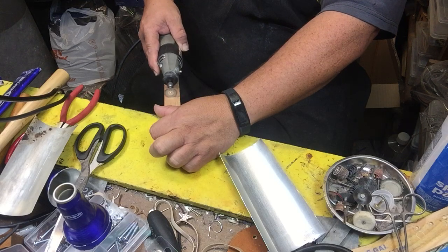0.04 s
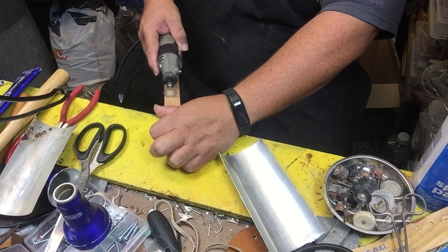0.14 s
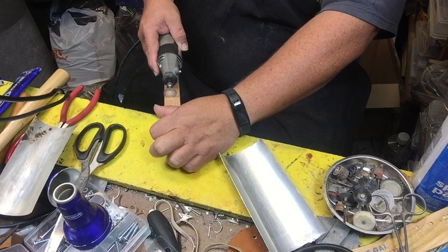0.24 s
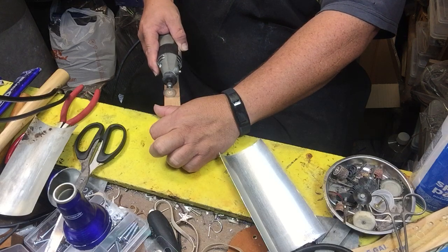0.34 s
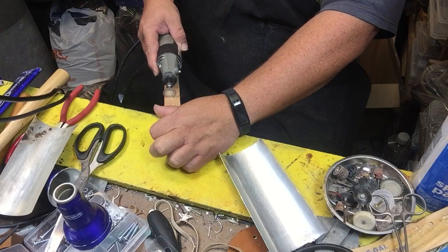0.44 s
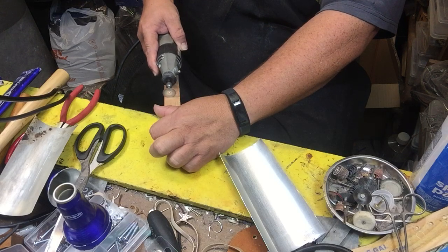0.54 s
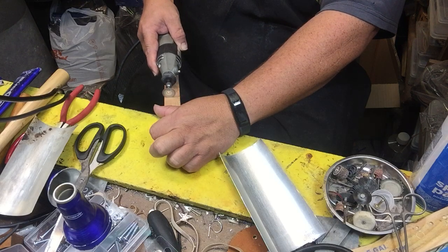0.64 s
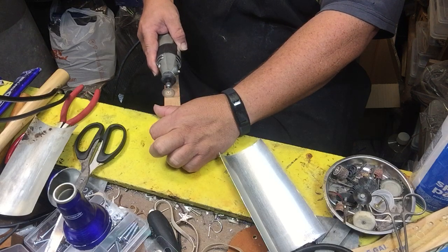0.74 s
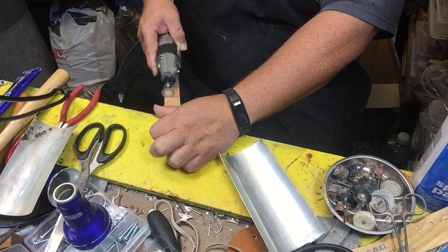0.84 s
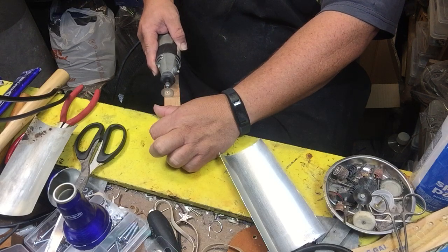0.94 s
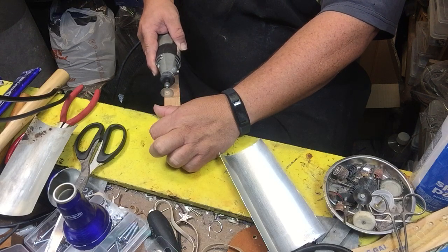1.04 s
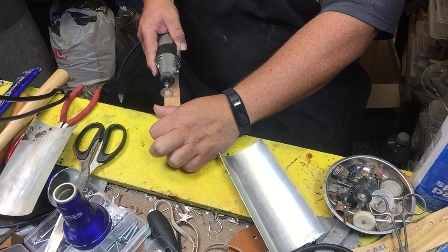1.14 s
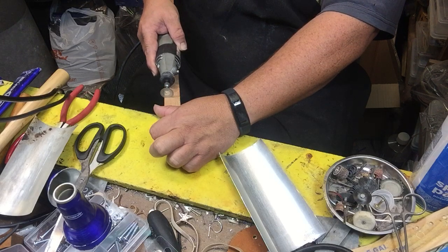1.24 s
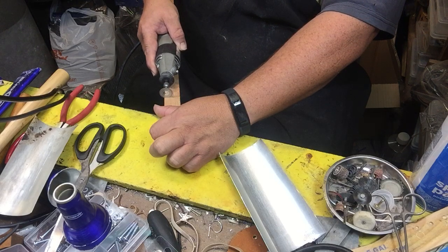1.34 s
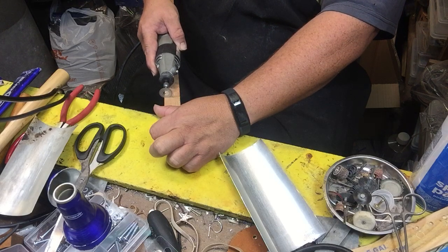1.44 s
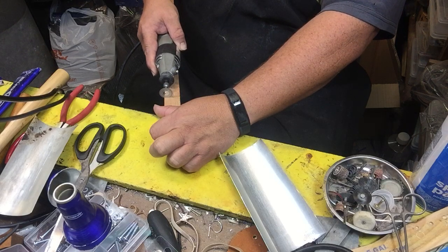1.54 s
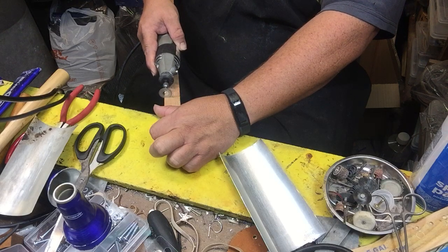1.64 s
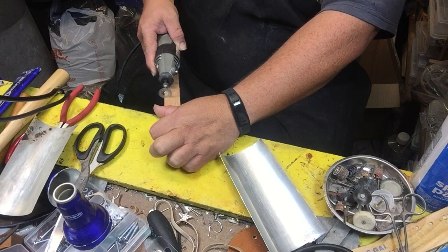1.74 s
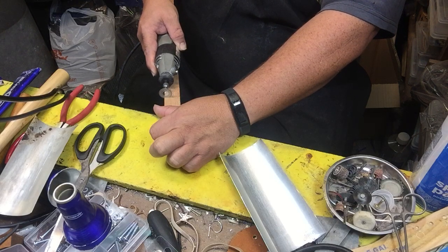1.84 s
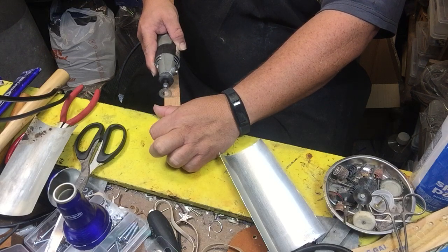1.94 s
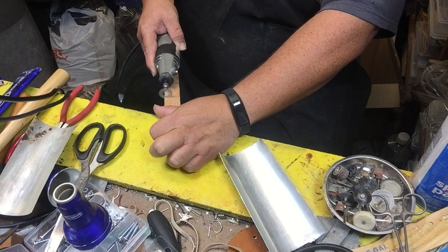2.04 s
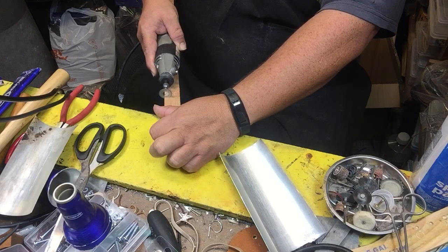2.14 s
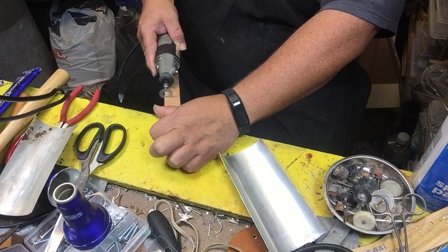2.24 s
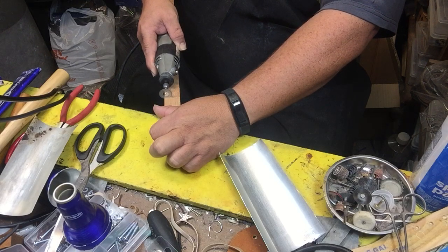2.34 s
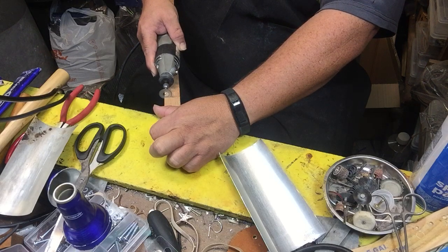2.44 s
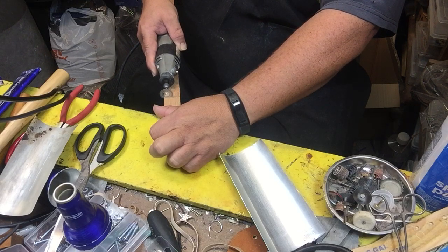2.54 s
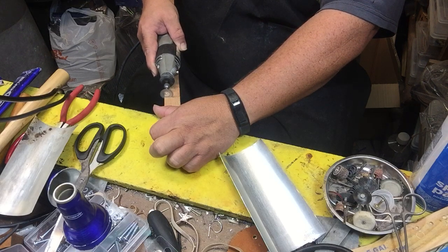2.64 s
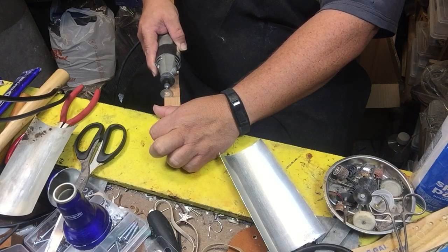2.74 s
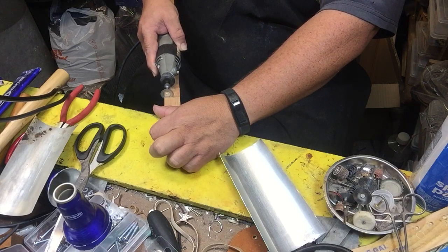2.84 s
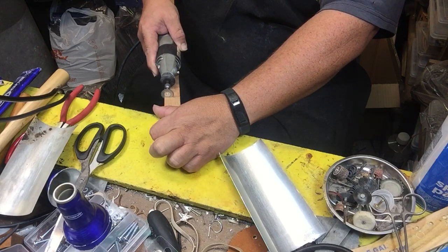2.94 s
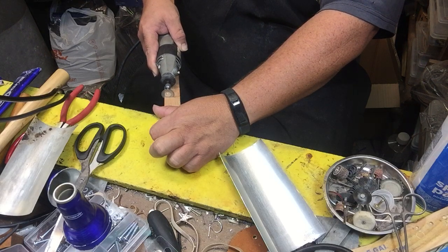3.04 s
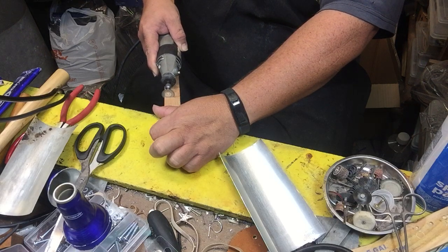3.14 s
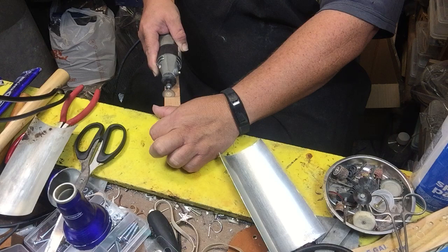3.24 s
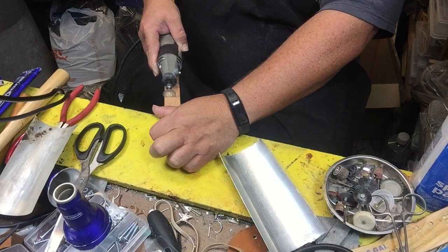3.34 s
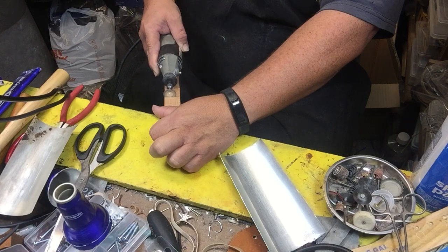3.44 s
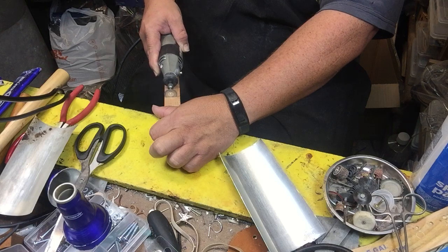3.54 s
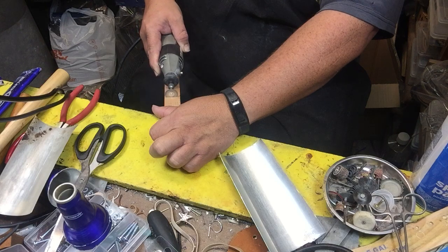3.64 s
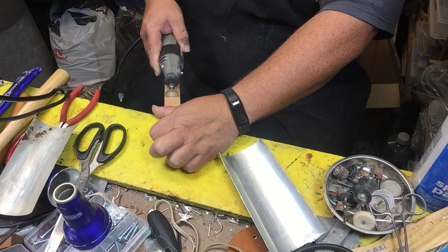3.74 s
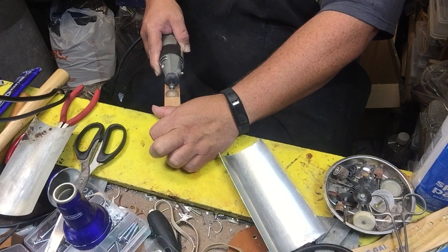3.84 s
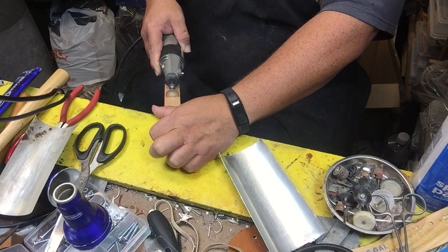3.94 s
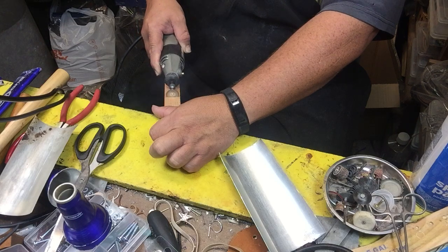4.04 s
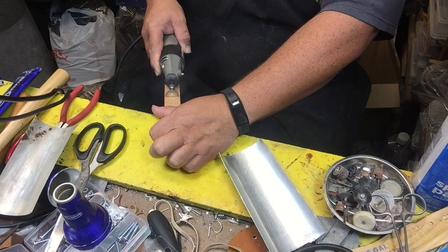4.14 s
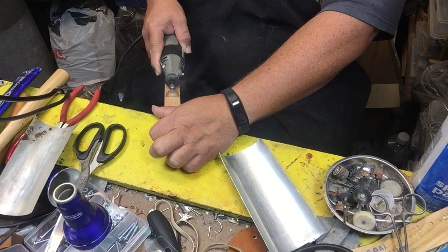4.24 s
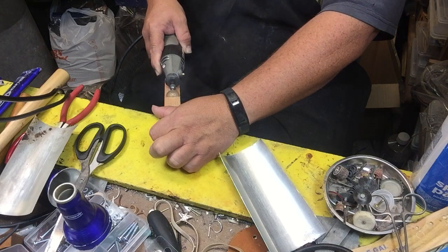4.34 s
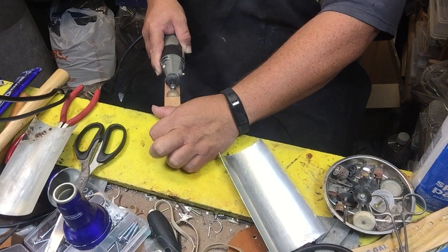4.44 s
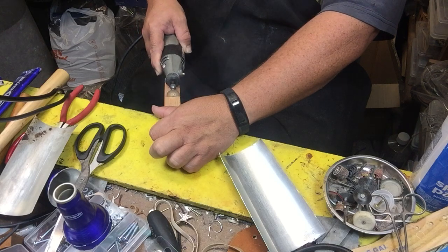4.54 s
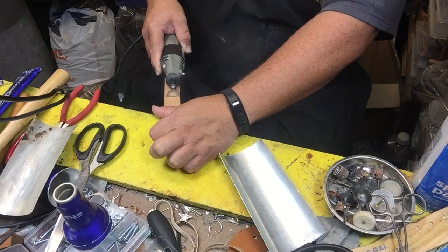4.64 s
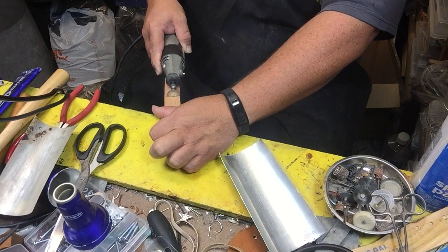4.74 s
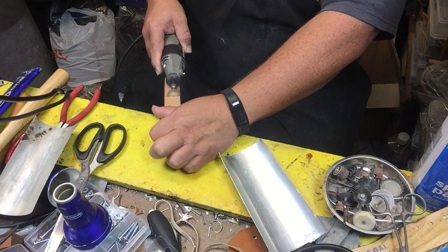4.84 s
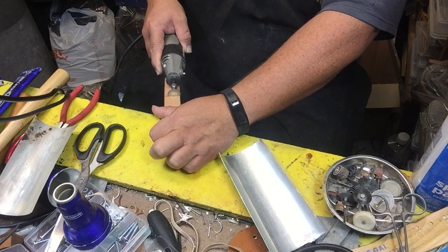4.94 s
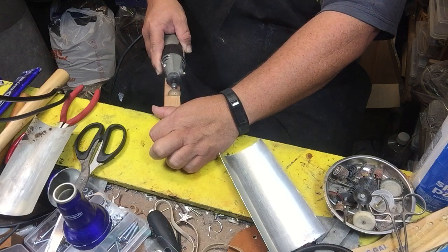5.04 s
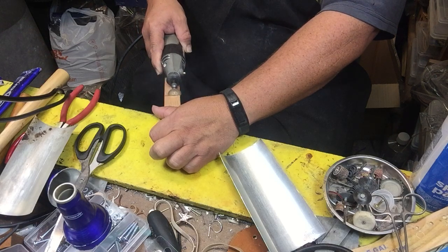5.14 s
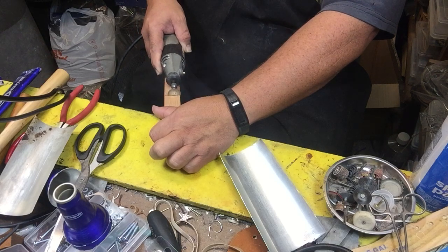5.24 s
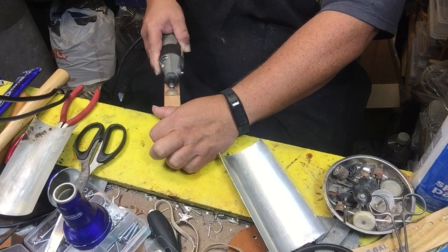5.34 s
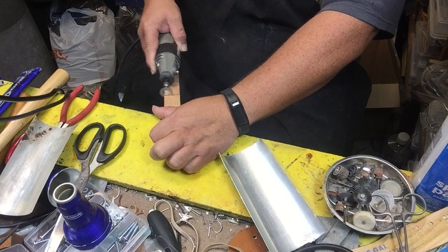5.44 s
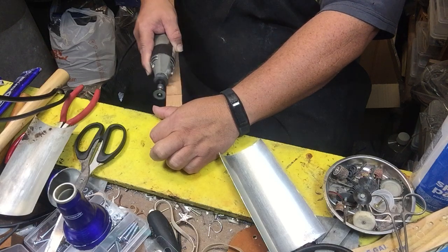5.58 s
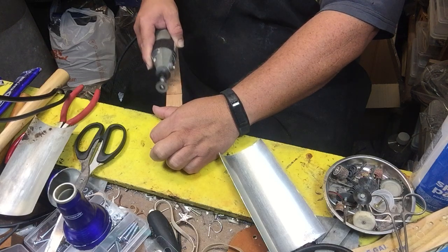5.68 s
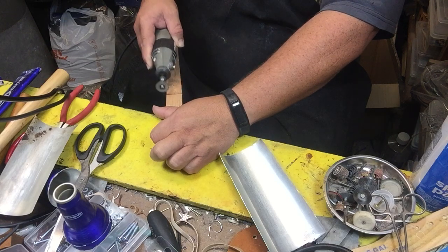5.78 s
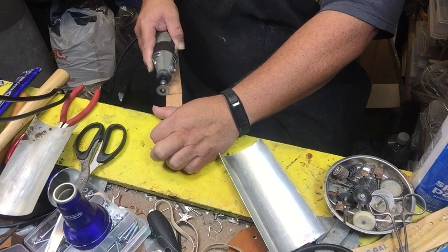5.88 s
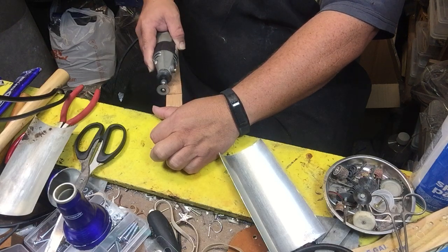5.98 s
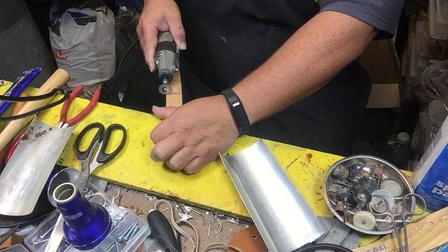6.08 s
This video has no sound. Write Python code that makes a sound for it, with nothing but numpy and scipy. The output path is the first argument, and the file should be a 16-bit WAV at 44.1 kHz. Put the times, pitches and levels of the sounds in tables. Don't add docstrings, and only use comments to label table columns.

```python
import sys
import numpy as np
from scipy import signal
from scipy.fft import rfft, irfft, next_fast_len
from scipy.io import wavfile
from scipy.ndimage import uniform_filter1d, map_coordinates

SR = 44100
rng = np.random.default_rng(int(sys.argv[2]) if len(sys.argv) > 2 else 0)


def gain_from_decibels(decibels):
    exponent = np.asarray(decibels, float) / 20
    return 10 ** exponent


def int16_out(signal):
    q = np.round(np.clip(np.atleast_2d(signal).T, -1, 1) * 32767)
    wavfile.write(sys.argv[1], SR, q.astype(np.int16))


N = 269495
RIPPLE_HZ = 120
KNOT_RATE_HZ, TURN_SAMPLES = 100, 2048
STEP_HZ = 50
USUAL_SCRAPE_DB = -30

# (time [s], speed [Hz])
SHAFT_SPEED = [(0, 293.6), (.09, 300.5), (.22, 291.2), (.33, 298.9), (.57, 307.4), (1.05, 302.4),
               (1.38, 311.7), (1.7, 315.1), (2.16, 309.5), (2.46, 282.4), (2.93, 263), (3.17, 228.6),
               (3.37, 225.1), (3.63, 205.3), (3.93, 200), (4.17, 172.8), (4.28, 141.9), (4.7, 233.4),
               (4.81, 242.3), (5.199, 258), (5.39, 296.3), (5.461, 308.3), (5.525, 276.2), (5.749, 283.7),
               (5.84, 309.4), (5.972, 329.7), (6.11, 341.8)]
# (time [s], scrape level [dB], grip to the bench [dB])
HAND_PRESSURE = [(0, -31.5, -3), (.47, -32.5, -1), (1.33, -34.5, -0.5), (1.75, -33, -2), (2.2, -30, 1),
                 (2.7, -31, 2), (3.06, -29, -2.5), (3.3, -24.5, -1.5), (3.85, -22, -1.5),
                 (3.97, -27.5, -11), (4.3, -31.5, -6), (4.66, -29.5, -23), (5.0, -30, -6.5),
                 (5.22, -29, -8), (5.44, -30.5, 3), (5.6, -32, 1.5), (5.75, -29.5, -11.5),
                 (6.11, -36, -9.5)]
# (time [s], half length [s], level [dB])
GRAIN_BITES = [(.01, 0.013, 7), (0.114, 0.02, 6), (0.195, 0.03, 7.5), (0.281, 0.012, 9.5),
               (0.354, 0.019, 6), (0.447, 0.0078, 5), (0.908, 0.01, 6), (1.14, 0.056, 3.5),
               (1.53, 0.093, 5.5), (2.1, 0.14, 3.5), (2.272, 0.014, 4), (2.452, 0.085, 4),
               (2.783, 0.042, 8.5), (3.032, 0.016, -1), (3.345, 0.056, 3), (3.518, 0.014, 3),
               (3.798, 0.029, 4.5), (4.233, 0.032, 7.5), (4.846, 0.041, 4.5), (5.013, 0.023, 4.5),
               (5.125, .06, 6), (5.51, .045, 11), (5.635, 0.006, 12), (6.053, 0.021, 4.5)]
# (time [s], length [s], loss of scrape [dB], of bench shake [dB], of wood drone [dB])
CONTACT_LIFTS = [
    (2.932, 0.076, -1.5, 6.5, 0.5),
    (3.736, 0.15, 2.2, 9, -1.7),
    (3.886, .08, 0.8, 19, -0.7),
    (4.513, 0.024, 1.5, 2, 0.1),
    (5.234, 0.077, 0, 19, 1.5),
    (5.311, 0.16, 0.1, 17.5, 14),
    (5.65, 0.058, 25, 12, 0),
    (5.759, 0.22, 16.5, 20, -5.5),
]
# (time [s], edge level [dB])
BIT_TILT = [(0, 2.3), (1.75, 1.5), (2.6, 0), (3.2, -1), (4.3, 0), (4.66, 4), (5.3, -2), (5.55, 4.5),
            (6.11, -6)]
# (frequency [Hz], level [dB])
WOOD_RESPONSE = [(260, -41), (450, -28), (623, -1.5), (767, -9.5), (903, -9.5), (1470, -6), (1920, -4.5),
                 (2470, -0.5), (2910, 0), (4540, -3), (5120, -3), (6390, 0), (9820, -15.5), (12600, -10.5),
                 (15600, -15.5)]
# (frequency [Hz], width [Hz], level [dB])
STRIP_MODES = [(950, 240, 7.5), (1380, 730, -3), (1516, 300, 11.5), (3510, 320, 7), (3626, 290, -5.5),
               (4076, 186, 10), (4657, 300, 10), (5380, 260, 6), (5900, 320, 3.5), (6390, 140, 3.5),
               (7840, 150, 2), (7880, 230, -6), (8230, 100, 6)]
# (time [s], half length [s], frequency [Hz], level
# [dB])
PASSING_BANDS = [(0.0, 0.72, 4340, 9), (0.783, .04, 5540, 12), (0.928, 0.33, 1570, 4.5), (.98, 1, 578, -8),
                    (1.142, 0.095, 8230, 9.5), (1.386, 0.11, 11040, 16), (1.65, 0.84, 2026, 15.5),
                    (5.127, 0.068, 1500, 9), (2.263, .05, 4400, 13), (2.265, 0.034, 5380, 11),
                    (2.423, 0.084, 4220, 12), (2.471, .071, 5900, 10.5), (2.49, 0.057, 9600, 9),
                    (2.496, .077, 12200, 12), (2.771, 0.14, 1570, 5), (3.493, 0.23, 4500, 10.5),
                    (3.644, .12, 2600, 9.5), (3.735, 0.13, 1240, 15), (3.834, .14, 7190, 21),
                    (3.857, 0.38, 589.6, -5), (4.72, 0.11, 4500, 6), (2.764, 0.045, 5380, 13),
                    (4.797, .11, 6200, 13), (4.908, 0.093, 3157, 14), (4.94, 0.064, 1400, 9),
                    (5.15, .25, 15180, 18), (5.388, 0.085, 3570, -20), (5.606, 0.32, 3560, 17),
                    (6.12, .19, 2890, 13), (6.12, .22, 12190, 8),
                    (.85, 0.36, 890, -13), (.7, .25, 1530, 8), (0.92, 0.17, 1950, -19.5), (1.45, 0.17, 500, 0),
                 (1.62, 0.22, 1630, 10.5), (1.835, 0.23, 2340, 4), (1.5, 0.34, 3120, -2),
                 (1.43, 0.061, 3200, -2), (3.8, 0.15, 3006, -3), (0.22, 0.11, 4300, 4.5),
                 (3.7, 0.45, 4250, 3.5), (1.7, 0.18, 4180, -8.5), (2.126, 0.067, 784, -25),
                 (2.13, 0.083, 1220, 12), (2.33, 0.11, 1960, -31), (2.6, 0.12, 820, 3.5),
                 (2.88, 0.037, 1000, -19), (3.8, 0.45, 510, -8), (3.2, 0.15, 1520, 12.5),
                 (3.17, 0.13, 1700, -11), (4.817, 0.093, 1270, 16.5), (4.65, 0.12, 1300, 6.5),
                 (5.5, 0.026, 960, -7), (2.03, 0.48, 1740, 4), (3.52, .08, 540, -21), (6.02, 0.24, 1370, -19),
                 (4.8, 0.045, 5200, -18), (5.15, 0.1, 6100, 21), (5.6, 0.082, 5200, -20)]
# (order [1], width [orders], level [dB])
FAVOURED_ORDERS = [
    (5.1, 0.4, -3),
    (16.6, 0.55, 1),
    (30.3, 0.93, 2.5),
    (44.2, 5.7, -0.5),
]
# (order [1], width [orders], level [dB], at speed [Hz], within [Hz])
LOADED_BARS = [
    (16, .5, 12, 158, 26),
    (48, 2, 11, 172, 26),
]
# (frequency [Hz], density [dB/Hz])
CHIP_SPECTRUM = [(180, -25), (300, -9), (757, -19.5), (1540, -2), (2010, -8), (2210, -4), (3760, -0.5),
                 (4430, 0.5), (10100, -4.5), (13900, -7.5), (15600, -4.5)]
# (speed [Hz], level [dB])
BENCH_RESPONSE = [(145, -45), (170, -41.5), (205, -35.5), (250, -29.5), (275, -32), (294, -25), (314, -29),
                  (340, -34.5)]
# (frequency [Hz], level [dB])
SECOND_RESPONSE = [(300, -36.5), (335, -49.5), (400, -49.5), (465, -52.5), (550, -48.5), (582, -62.5),
                   (602, -47), (680, -59.5)]
# (frequency [Hz], width [Hz], level [dB])
CASE_MODES = [
    (2380, 320, 2.5),
    (4930, 2300, -7),
    (7350, 1200, -9.5),
]
# (frequency [Hz], half width [Hz], level [dB])
CASE_DEAD_SPOT = (2500, 31, -10)
# (order [1], ripple sideband [1], level [dB])
SLOT_TONES = [
    (8, 0, 0),
    (8, -1, -2.5),
    (8, 1, -14),
    (16, 0, -6),
    (16, -1, -8),
    (18, 0, -8),
    (24, -1, -6),
    (24, 0, -8),
]
# (time [s], half length [s], level [dB])
CASE_MUFFLES = [
    (0.622, 0.2, -4.5),
    (1.337, 0.11, -12),
    (1.744, 0.17, -3.5),
    (2.083, 0.11, -13),
    (2.858, 0.13, -14),
    (5.146, .08, -11),
    (5.607, 0.035, -3.5),
    (5.665, .015, -17),
]
# (frequency [Hz], density [dB/Hz])
SHOP_SPECTRUM = [(13, -63), (22, -45), (32, -29), (41, -34), (65, 13), (97, 2), (125, -2), (152, -40),
                 (240, -28), (310, -36), (530, -120)]
# (time [s], level [dB], rise [s])
BENCH_NUDGE = (5.67, -54, 0.053)
# (time [s], peak [dB], thud relative to it [dB], length [s])
BIT_JUMPS = [
    (5.458, -12.5, -25, 0.012),
    (5.641, -5.5, -19, 0.0056),
    (5.685, -22, -59, 0.018),
]


def unit(x):
    return x / np.sqrt(np.mean(np.abs(x) ** 2) + 1e-20)


def bell(v, mid, width):
    return np.exp(-.5 * ((v - mid) / width) ** 2)


def along(points, hz):
    f, v = np.transpose(points)
    return np.interp(np.log(hz + 1), np.log(f + 1), v)


def curves(rows, t):
    s, *cols = np.transpose(rows)
    return [np.interp(t, s, c) for c in cols]


def drift(rows, t, rate_hz):
    row, at = np.meshgrid(np.arange(rows), t * rate_hz, indexing="ij")
    return map_coordinates(rng.standard_normal((rows, 400)), [row, at], mode="nearest")


def filtered(x, response):
    m = next_fast_len(N + SR // 2)
    return irfft(rfft(x, m) * response(np.fft.rfftfreq(m, 1 / SR)), m)[..., :N]


def noise(spectrum):
    return unit(filtered(rng.standard_normal(N), lambda hz: gain_from_decibels(along(spectrum, hz))))


def knot_times():
    return np.arange(int(N / SR * KNOT_RATE_HZ) + 2) / KNOT_RATE_HZ


def shaft_speed(t):
    return curves(SHAFT_SPEED, t)[0]


def contact_losses(t):
    edge_s = 0.0064
    step = lambda s: .5 + .5 * np.tanh((t - s) / edge_s)
    return sum(np.outer(loss_db, step(s) - step(s + length)) for s, length, *loss_db in CONTACT_LIFTS)


def cut_levels(t):
    press_db = curves(HAND_PRESSURE, t)[0]
    press_db = press_db + sum(db * bell(t, s, length) for s, length, db in GRAIN_BITES)
    scrape_loss_db, _, drone_loss_db = contact_losses(t)
    level_db = press_db - scrape_loss_db
    extra_db = press_db - USUAL_SCRAPE_DB
    low_db = -3 - 0.78 * extra_db - drone_loss_db
    high_db = -0.5 - 0.59 * extra_db - 0.53 * drone_loss_db + curves(BIT_TILT, t)[0]
    slowed_hz = 300 - shaft_speed(t)
    fibre_db = -6 - 0.38 * (level_db - USUAL_SCRAPE_DB) + .02 * slowed_hz
    return level_db, low_db, high_db, fibre_db


def tone_shelves(hz, low_db, high_db):
    return low_db / (1 + (hz / 2300) ** 6) + high_db / (1 + (8000 / hz) ** 12)


def strip_colour(patchy_db):
    t, hz = knot_times(), np.arange(SR // 2 // STEP_HZ + 1) * STEP_HZ
    steady = sum(db * bell(hz, mid, width / 2) for mid, width, db in STRIP_MODES)
    passing = sum(db * np.outer(bell(hz, mid, 150 + 0.004 * mid), bell(t, s, length))
                  for s, length, mid, db in PASSING_BANDS)
    patches = drift(len(hz), t, 2.88) + 2.6 * drift(len(hz), t, 11)
    patches = unit(uniform_filter1d(patches, size=6, axis=0))
    patches = patches * np.clip(hz / 5000, .15, 1)[:, None]
    return steady[:, None] + passing + patchy_db * patches


def scrape(turns, colour_db, wander_db, slip, buzz):
    t, now = knot_times(), np.arange(N) / SR
    level_db, low_db, high_db, _ = cut_levels(t)
    order = np.arange(3, 112)[:, None]
    hz = order * shaft_speed(t)
    count = len(order)
    held_at = [hz / STEP_HZ, 0 * hz + np.arange(len(t))]
    held_db = map_coordinates(colour_db, held_at, order=1, mode="nearest")
    order_db = sum(db * bell(order, mid, width) for mid, width, db in FAVOURED_ORDERS)
    order_db = order_db + sum(db * bell(order, mid, width) * bell(hz / order, at, span)
                              for mid, width, db, at, span in LOADED_BARS)
    wander = np.clip(hz / 4000, .2, 1) * drift(count, t, 6)
    gain = gain_from_decibels(along(WOOD_RESPONSE, hz) + held_db + order_db + wander_db * wander) * (hz < 17000)
    angle = 1.19 * rng.standard_normal((count, 1)) + slip * np.sqrt(hz / 4000) * drift(count, t, 7)
    middle = np.sqrt(np.sum(gain ** 2 * (hz > 3000) * (hz < 8000), axis=0) / 2)
    gain *= gain_from_decibels(level_db + tone_shelves(hz, low_db + 5.5, high_db + 8.5)) / middle
    lines = np.zeros((TURN_SAMPLES // 2 + 1, len(t)), complex)
    lines[order[:, 0]] = gain * np.exp(1j * angle) * TURN_SAMPLES / 2
    shapes = irfft(lines, TURN_SAMPLES, axis=0)
    shapes = np.vstack([shapes, shapes[:1]])
    mains = np.pi * RIPPLE_HZ * now
    ripple = 1 + buzz * np.cos(2 * mains) + 0.011 * np.cos(mains)
    return ripple * map_coordinates(shapes, [turns % 1 * TURN_SAMPLES, now * KNOT_RATE_HZ], order=1)


def chip_hiss(turns, colour_db, gate, share):
    t, hz = knot_times(), np.arange(len(colour_db))[:, None] * STEP_HZ + 1
    level_db, low_db, high_db, fibre_db = cut_levels(t)
    gain_db = level_db + fibre_db + tone_shelves(hz, low_db + 3, high_db - 1.5)
    gain_db = gain_db + share * colour_db
    burst = unit(np.exp(gate * np.cos(2 * np.pi * turns)) * noise(CHIP_SPECTRUM))
    z = signal.stft(burst, nperseg=SR // STEP_HZ)[2]
    return signal.istft(z * gain_from_decibels(gain_db[:, :z.shape[1]]), nperseg=SR // STEP_HZ)[1][:N]


def motor(turns, speed):
    now = np.arange(N) / SR
    loose_db = np.interp(now, now[::32], contact_losses(now[::32])[1])
    grip_db = curves(HAND_PRESSURE, now)[1]
    shake_db = along(BENCH_RESPONSE, speed) + grip_db - loose_db
    second_db = along(SECOND_RESPONSE, 2 * speed) - 0.86 * loose_db - 0.36 * grip_db
    whine_db = -37 + 0.083 * loose_db
    whine_db = whine_db + sum(db * bell(now, s, length) for s, length, db in CASE_MUFFLES)
    flutter = drift(3, now[::64], 30).repeat(64, axis=1)[:, :N]
    flutter = uniform_filter1d(flutter, 64, axis=1)
    out = np.sqrt(2) * gain_from_decibels(shake_db + .5 * flutter[0]) * np.sin(2 * np.pi * turns)
    out += np.sqrt(2) * gain_from_decibels(second_db + 1.3 * flutter[1]) * np.sin(4 * np.pi * turns)
    case = lambda f: sum(gain_from_decibels(db) / np.hypot(1, 2 * (f - c) / w) for c, w, db in CASE_MODES)
    dead_hz, dead_width_hz, dead_db = CASE_DEAD_SPOT
    for order, side, db in SLOT_TONES:
        hz = order * speed + side * RIPPLE_HZ
        ring = case(hz) ** 2.06 * gain_from_decibels(dead_db * bell(hz, dead_hz, dead_width_hz))
        angle = 2 * np.pi * (order * turns + side * RIPPLE_HZ * now + rng.random())
        out += np.sqrt(2) * gain_from_decibels(whine_db + db + 0.46 * flutter[2]) * ring * np.sin(angle)
    return out


def shop():
    now = np.arange(N) / SR
    hum = gain_from_decibels(-62.5) * np.sin(2 * np.pi * RIPPLE_HZ * now)
    hiss = gain_from_decibels(-53.5) * noise([(150, 0), (400, 2.5), (750, -4), (3000, 0), (15000, -11)])
    start_s, nudge_db, rise_s = BENCH_NUDGE
    u = np.clip(now - start_s, 0, None) / rise_s
    nudge = gain_from_decibels(nudge_db) * u * np.exp(1 - u) * noise([(15, -30), (40, 2), (70, -6), (130, -40)])
    return gain_from_decibels(-68) * noise(SHOP_SPECTRUM) + hum + hiss + nudge


def jumps():
    out, t = np.zeros(N + SR), np.arange(SR // 4) / SR
    crack = noise(WOOD_RESPONSE)
    thud = noise([(20, -21), (120, 0), (400, 10), (1200, -13)])
    for s, db, thud_db, length in BIT_JUMPS:
        at, u = round(s * SR), t / length
        before = slice(at - len(t), at)
        hit = gain_from_decibels(db - 10.5) * crack[before] * 4 * u * np.exp(1 - 4 * u)
        hit += gain_from_decibels(db + thud_db - 20.0) * thud[before] * u / 3 * np.exp(1 - u / 3)
        out[at:at + len(t)] += hit
    return out[:N]


def room(x, t60_s, wet_db, dull_hz):
    t = np.arange(SR // 4) / SR
    tail = rng.standard_normal(len(t)) * gain_from_decibels(-60 * t / t60_s) * (t > .004)
    wet = signal.fftconvolve(x, tail / np.linalg.norm(tail))[:N]
    return x + gain_from_decibels(wet_db) * filtered(wet, lambda hz: 1 / np.hypot(1, hz / dull_hz))


def scene():
    speed = uniform_filter1d(shaft_speed(np.arange(N) / SR), size=SR // 22)
    turns = np.cumsum(speed) / SR
    colour_db = strip_colour(patchy_db=3.5)
    cut = scrape(turns, colour_db, wander_db=2.0, slip=0.32, buzz=0.037)
    cut = cut + chip_hiss(turns, colour_db, gate=1.0, share=0.3)
    mono = room(cut + jumps(), t60_s=0.066, wet_db=-1, dull_hz=4400) + motor(turns, speed) + shop()
    return np.array([mono, mono])


def top_cut(x):
    return signal.sosfilt(signal.butter(12, 15700, fs=SR, output="sos"), x)


def record(dry):
    band = lambda hz: (hz < 15720) / np.hypot(1, (38 / (hz + 1)) ** 3)
    return top_cut(filtered(dry, band))


dry = scene()
out = record(dry)
int16_out(out)
```